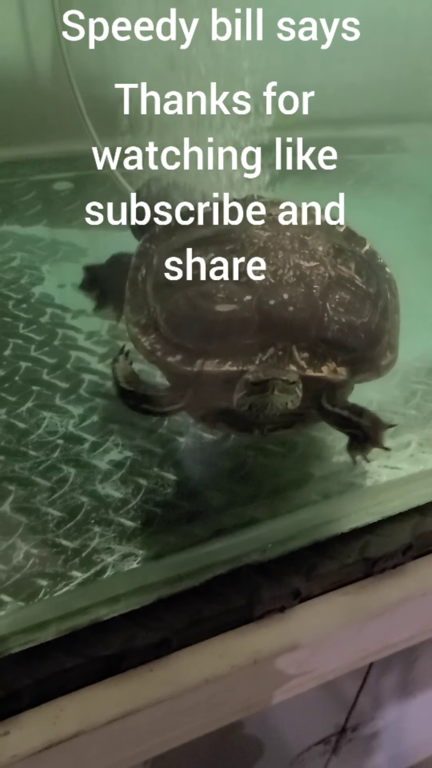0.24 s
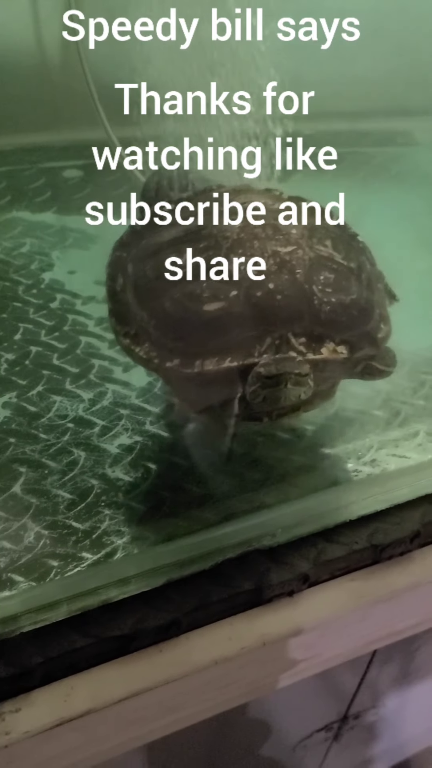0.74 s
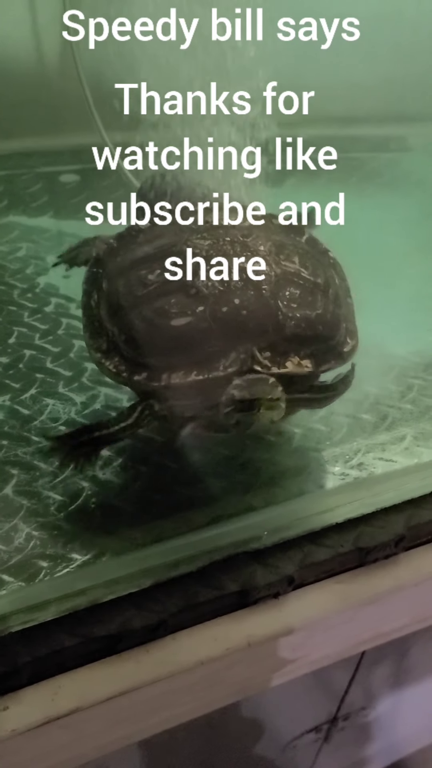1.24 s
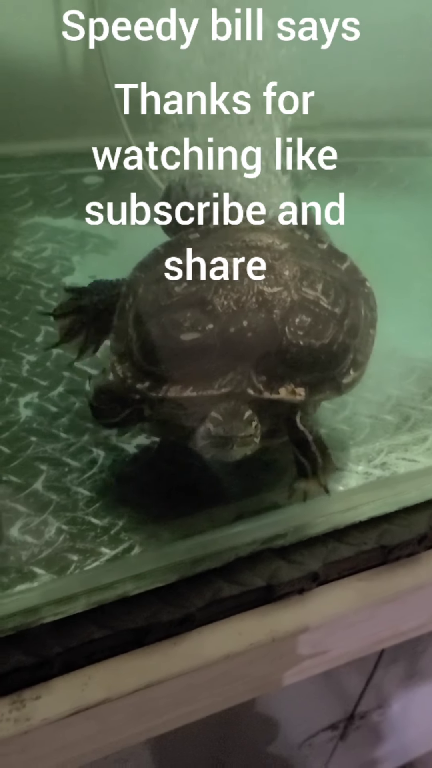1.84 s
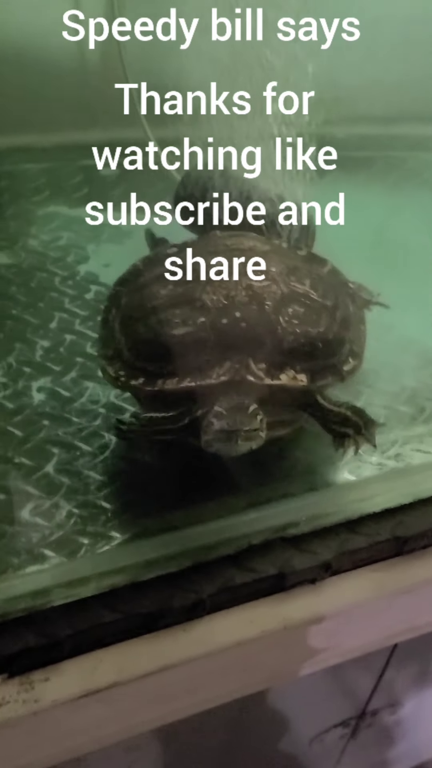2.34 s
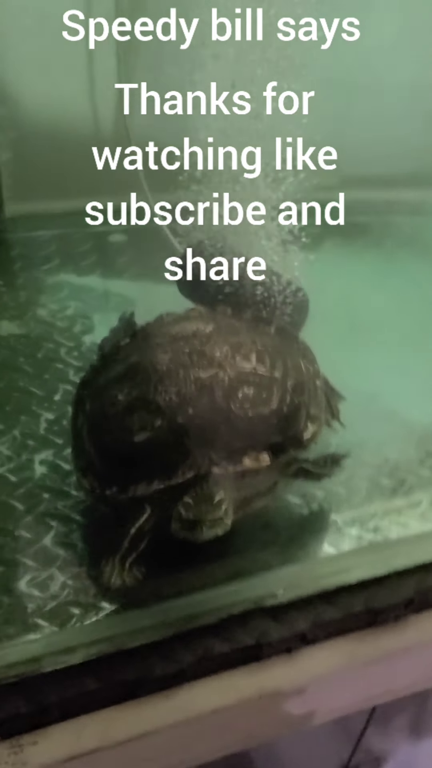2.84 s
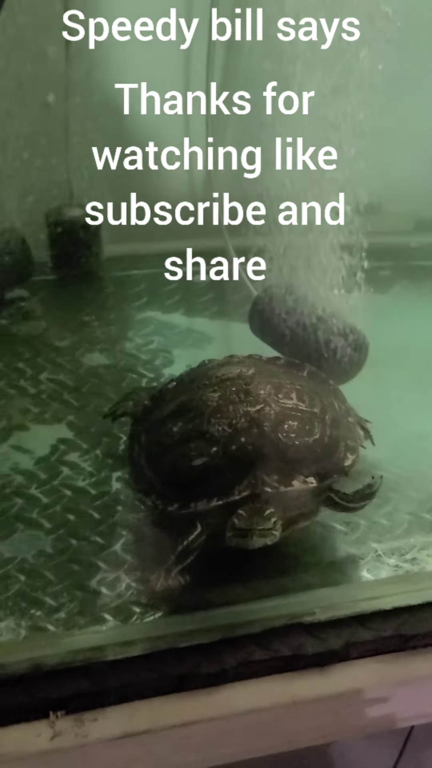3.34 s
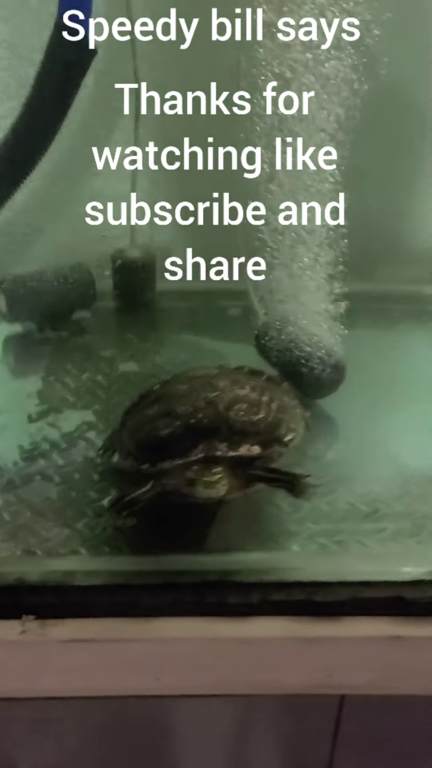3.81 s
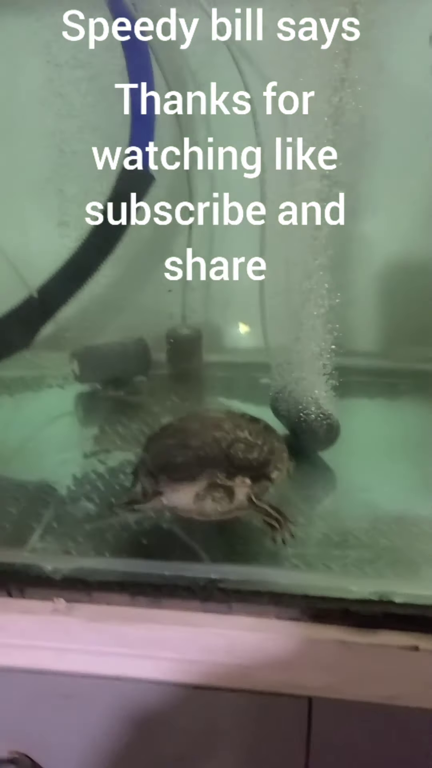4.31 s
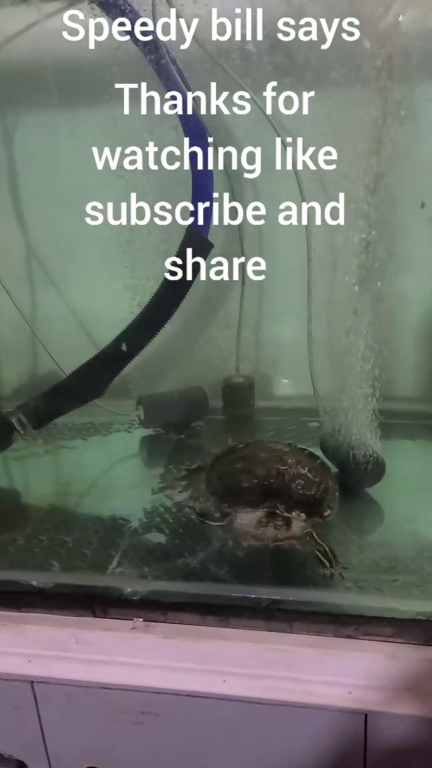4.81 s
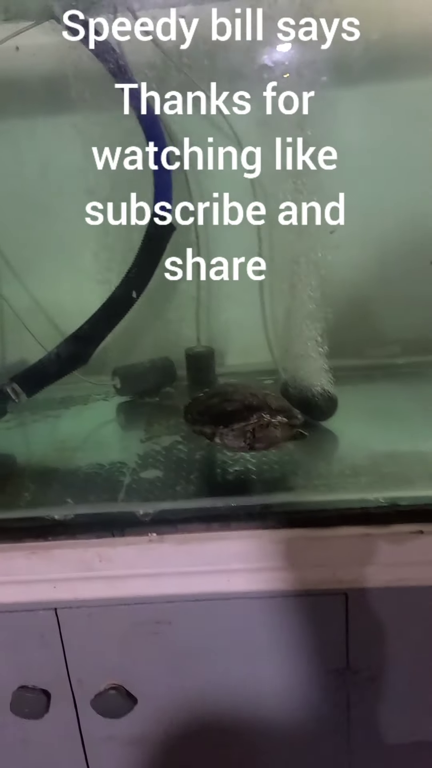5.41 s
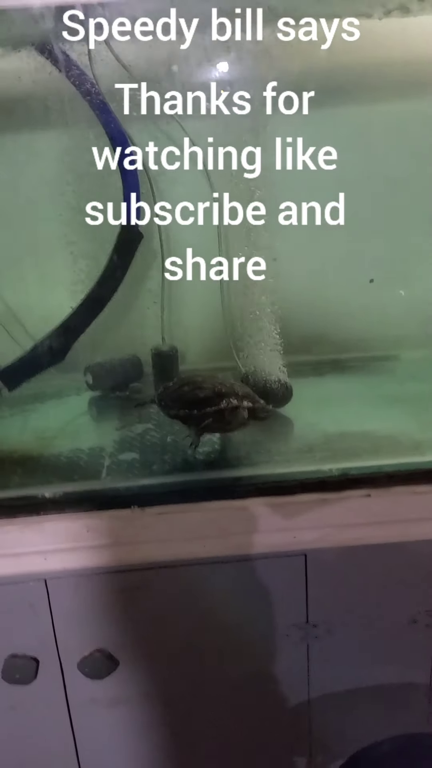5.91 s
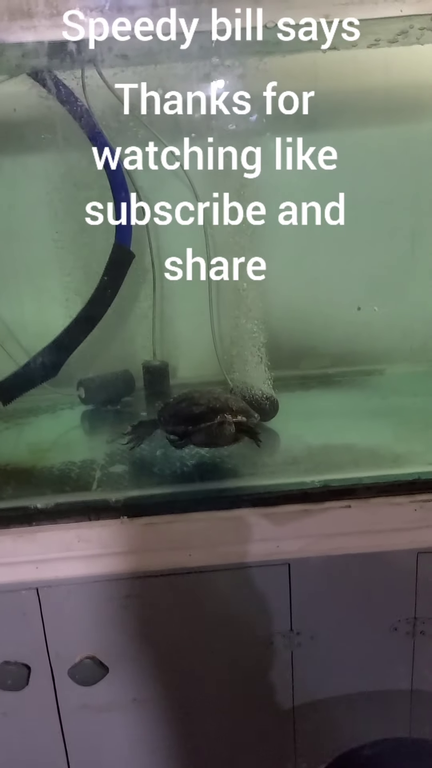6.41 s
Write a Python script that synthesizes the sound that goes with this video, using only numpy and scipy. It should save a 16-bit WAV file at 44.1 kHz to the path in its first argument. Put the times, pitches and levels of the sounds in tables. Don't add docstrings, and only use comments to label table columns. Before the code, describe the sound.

An aquarium air pump hums low and steady while bubbles gurgle and froth hisses, with a sharp wet snap and a later soft low thump.

```python
import sys
import numpy as np
from scipy import signal
from scipy.fft import rfft, irfft, next_fast_len
from scipy.io import wavfile
from scipy.ndimage import uniform_filter1d, map_coordinates

SR = 44100
rng = np.random.default_rng(int(sys.argv[2]) if len(sys.argv) > 2 else 0)


def makeup_ratio(level_db):
    decades = np.asarray(level_db, float) / 20
    return 10 ** decades


def inscribe(sig):
    pcm = np.round(np.clip(np.atleast_2d(sig).T, -1, 1) * 32767)
    wavfile.write(sys.argv[1], SR, pcm.astype(np.int16))


N = 293485
TIME = np.arange(N) / SR

# time in seconds, distance from 0 (at the glass) to 1 (across the room).
RETREAT = [
    (0, 0.024),
    (3.3, 0.088),
    (4.15, 0.5),
    (4.85, 0.6),
    (5.55, .75),
    (6.25, 0.87),
    (6.65, 1),
]
ROOM_REACH = 1.3

MAINS_HZ, STROKE_START_S = 60.03, .0053
# multiple of the mains, near level in dB, far level in dB, left-right difference near
# in dB, the same far in dB.
FUNDAMENTAL = (1, -35, -37.5, -60.5, -58)
# multiple of the mains, near level
# in dB, room level in dB, the room wave's sign and share (1 with the tank's, -1 against it).
STRONG_OVERTONES = [(2, -38.5, -83, -0.28), (4, -56.5, -53.5, -0.72), (6, -63.5, -52, 0.92),
                    (7, -53.5, -67, -0.18)]
# multiple of the mains, near level in dB, far level in dB.
STRONG_DIFFERENCE = [(2, -65, -58), (4, -76, -72), (6, -57, -56), (7, -71, -66)]
# multiple of the mains, near level in dB, far level in dB, left-right
# difference near in dB, the same far in dB.
WEAK_LINES = [(2.5, -56, -59, -87, -76), (3, -63, -57, -86, -85), (3.5, -62, -70, -88, -90),
              (5, -61, -64, -90, -66), (8, -62, -70, -65, -67), (9, -66, -64, -71, -71),
              (10, -63, -73, -68, -69), (11, -64, -61, -68, -67), (12, -60, -71, -67, -77),
              (13, -67, -65, -70, -73), (14, -65, -76, -69, -68), (15, -68, -79, -84, -85)]

# frequency in Hz, level in dB per Hz.
RUMBLE = [(20, -77), (40, -72.5), (90, -69), (200, -79), (300, -82.5), (450, -100)]
LEFT_GURGLE = [(300, -74.5), (450, -77), (700, -76), (1000, -78), (1400, -76), (1900, -78.5), (2200, -87.5)]
RIGHT_GURGLE = [(300, -73.5), (450, -75), (750, -75), (1050, -81), (1400, -77.5), (1900, -82), (2200, -86)]
LEFT_FIZZ = [(2200, -87), (3050, -82.5), (3350, -92), (4050, -88.5), (4800, -93), (5700, -89.5),
             (7000, -92.5), (8200, -85), (8600, -97.5), (9900, -101), (12200, -89), (12600, -105),
             (13200, -84.5), (15500, -91.5)]
RIGHT_FIZZ = [(2200, -88.5), (3050, -91.5), (3350, -87.5), (4000, -93.5), (4500, -87), (5700, -90),
              (7100, -85.5), (7700, -93.5), (8600, -95.5), (9500, -93.5), (11300, -91), (12000, -84),
              (13600, -85), (15700, -86)]
# frequency in Hz, likeness from -1 to 1.
RUMBLE_ALIKE = [(40, 1), (120, 0.9), (200, 1), (400, 0.12)]
GURGLE_ALIKE = [(250, .97), (400, .55), (700, .15), (1000, -.2), (1600, -.35), (2100, .3)]
FIZZ_ALIKE = [(3000, .35), (4000, .2), (9000, .15)]
# near dB, far dB, dB gained midway while the surface faces the phone.
GURGLE_NEAR_DB, GURGLE_FAR_DB, GURGLE_MIDWAY_DB = (-0.5, -1.7), (-5.5, -1.5), (-1.6, 1.8)
FIZZ_NEAR_DB, FIZZ_FAR_DB, FIZZ_MIDWAY_DB = (-3, -0.6), (-0.9, 0), (2.5, 0.94)
STROKE_PULSE_DB = -0.73
LEFT_LEAD_S = .00047

# near pitch in Hz, far pitch in Hz, width in Hz, near level in dB,
# far level in dB, left-right balance in dB.
PORES = [
    (2508, 2550, 60, -60.5, -56, -2),
    (2803, 2790, 130, -59.5, -59.5, -4),
    (5315, 5330, 112, -56.5, -55.5, -2.5),
]
# start in seconds, pitch in Hz, length in seconds, level in dB,
# left-right balance in dB.
WHISTLES = [(.22, 5460, 0.038, -52, -2), (1.0, 5450, .03, -54, -3), (2.335, 5280, 0.033, -48, -6),
            (3.9, 5640, .022, -52, 2), (3.96, 5330, 0.046, -52, -8), (5.1, 2580, 0.04, -48.5, -2),
            (5.8, 2570, 0.064, -50.5, -4), (6.1, 2560, 0.035, -51.5, -6), (6.19, 5350, .08, -57, -10),
            (4.786, 375, 0.0203, -37.5, 0), (4.801, 354, 0.052, -44, 2), (4.814, 412, 0.013, -41, 9),
            (6.5, 413.5, 0.063, -47, 0)]
# start in seconds, peak level in dB, 60 dB decay in seconds, left-right balance in dB.
SPLASHES = [
    (1.13, -44, .1, -3),
    (1.865, -43, .06, 4),
    (2.047, -38, .035, -4),
    (3.2, -44, .1, -2),
    (4.0, -40, .05, -3),
    (5.862, -39.5, .15, -6),
    (6.14, -43, .1, -2),
    (6.43, -43, .08, 2),
]
# start in seconds, peak level in dB, 60 dB decay in seconds, left-right
# balance in dB.
SNAP = [
    (2.913, -29, 0.022, -4),
    (2.917, -29, 0.025, -8.5),
    (2.925, -37, 0.089, -3),
    (2.938, -40, 0.075, -6),
]
SPLASH_RISE, SNAP_RISE = .07, .015
TICK_HZ, TICK_DB = 1400, -33
# resonance in Hz, width in Hz, level in dB.
PORT_CAVITY = [
    (7100, 640, 7),
    (11200, 1800, 3),
]
# start in seconds, level in dB.
GUSTS = [
    (4.421, -17),
    (4.525, -25),
    (4.572, -27),
]
PUFF_RISE_S, PUFF_T60_S, FLUTTER_HZ, FLUTTER_SHARE = .03, .27, 34, .7

TOP_HZ = 15760


def along(points, hz):
    point_hz, value = np.transpose(points)
    return np.interp(np.log(hz + 1), np.log(point_hz + 1), value)


def wobble(rate):
    knots = rng.standard_normal(int(N * rate / SR) + 4)
    return map_coordinates(knots, [TIME * rate])


def filtered(x, response):
    size = next_fast_len(N + 8192)
    spectrum = rfft(x, size) * response(np.fft.rfftfreq(size, 1 / SR))
    return irfft(spectrum, size)[..., :N]


def patchy(x, depth_db, window, bins, frames):
    raise NotImplementedError


def ports(left, right, hz):
    return makeup_ratio([along(left, hz), along(right, hz)])


def pan(left_right_db):
    return makeup_ratio([[left_right_db / 2], [-left_right_db / 2]])


def add(out, start_s, sound):
    part = out[:, max(round(start_s * SR), 0):][:, :sound.shape[1]]
    part += sound[:, :part.shape[1]]


def pump(away, far):
    def between(near_db, far_db):
        return near_db + far * (far_db - near_db)

    stroke = 2 * np.pi * MAINS_HZ * (TIME + STROKE_START_S)
    _, near_db, far_db, side_near_db, side_far_db = FUNDAMENTAL
    late = away ** 2.7
    mid = makeup_ratio(near_db + late * (far_db - near_db))
    side = makeup_ratio(between(side_near_db, side_far_db))
    out = np.sqrt(2) * np.cos(stroke - 0.37 * far) * (mid + side * [[1], [-1]])

    lines = []
    for k, near_db, far_db, side_near_db, side_far_db in WEAK_LINES:
        lines.append((k, makeup_ratio(between(near_db, far_db)), between(side_near_db, side_far_db)))
    for (k, near_db, room_db, sign), (_, side_near_db, side_far_db) in zip(STRONG_OVERTONES, STRONG_DIFFERENCE):
        size = (1 - away) * makeup_ratio(near_db) + away * sign * makeup_ratio(room_db)
        lines.append((k, size, between(side_near_db, side_far_db)))
    for k, size, side_db in lines:
        phase = k * stroke + (rng.uniform(0, 2 * np.pi) if k > 2 else -np.pi / 2)
        shake = makeup_ratio(.17 * k * wobble(4))
        mid = size * np.cos(phase)
        side = makeup_ratio(side_db) * np.sin(phase)
        out = out + np.sqrt(2) * shake * np.array([mid + side, mid - side])
    return out


def white_pair(alike, patchy_db, lead_s):
    z = signal.stft(rng.standard_normal((2, N)), nperseg=512)[2]
    field = uniform_filter1d(rng.standard_normal(z.shape[1:]), size=5, axis=0)
    field = uniform_filter1d(field, size=8, axis=1)
    pair = signal.istft(z * makeup_ratio(patchy_db * field / field.std()), nperseg=512)[1][:, :N] * np.sqrt(SR / 2)

    def mid_side(hz):
        turn = np.arccos(np.clip(along(alike, hz), -1, 1)) / 2
        return np.array([np.cos(turn), np.sin(turn)])

    mid, side = filtered(pair, mid_side)
    return filtered(np.array([mid + side, mid - side]),
                    lambda hz: np.exp(1j * np.pi * lead_s * hz * [[1], [-1]]))


def passing(away, near_db, far_db, midway_db):
    near_db, far_db, midway_db = np.reshape([near_db, far_db, midway_db], (3, 2, 1))
    return makeup_ratio(near_db + away * (far_db - near_db) + midway_db * np.sin(np.pi * away))


def water(away, far):
    def low(hz):
        return 1 / (1 + (hz / 2200) ** 8)

    def body(hz):
        return ports(LEFT_GURGLE, RIGHT_GURGLE, hz) * np.sqrt(low(hz)) / (1 + (230 / (hz + 1)) ** 4)

    def froth(hz):
        return ports(LEFT_FIZZ, RIGHT_FIZZ, hz) * np.sqrt(1 - low(hz))

    gurgle = filtered(white_pair(GURGLE_ALIKE, patchy_db=0.72, lead_s=0), body)
    fizz = filtered(white_pair(FIZZ_ALIKE, patchy_db=1.17, lead_s=LEFT_LEAD_S), froth)
    rumble = filtered(white_pair(RUMBLE_ALIKE, patchy_db=1.0, lead_s=0), lambda hz: makeup_ratio(along(RUMBLE, hz)))

    deep = filtered(gurgle, lambda hz: 1 / (1 + (hz / 900) ** 6))
    gurgle = passing(away, GURGLE_NEAR_DB, GURGLE_FAR_DB, GURGLE_MIDWAY_DB) * (gurgle - deep)
    gurgle += makeup_ratio(far * [[-.5], [-1.5]]) * deep
    fizz = passing(away, FIZZ_NEAR_DB, FIZZ_FAR_DB, FIZZ_MIDWAY_DB) * fizz

    stroke = makeup_ratio(STROKE_PULSE_DB * np.cos(2 * np.pi * MAINS_HZ * TIME))
    seethe = makeup_ratio(.5 * wobble(8) + .25 * wobble(25))
    return gurgle * stroke * makeup_ratio(0.48 * wobble(7.4)) + fizz * seethe + makeup_ratio(-2.5 * far) * rumble


def standing(x, depth_db):
    z = signal.stft(x, nperseg=2048)[2]
    field = uniform_filter1d(rng.standard_normal(z.shape), size=3, axis=1)
    field = uniform_filter1d(field, size=50, axis=2)
    return signal.istft(z * makeup_ratio(depth_db * field / field.std()), nperseg=2048)[1][:, :N]


def pores(far):
    out = np.zeros((2, N))
    for near_hz, far_hz, width_hz, near_db, far_db, left_right_db in PORES:
        pitch = near_hz + far * (far_hz - near_hz) + 30 * wobble(4)
        phase = 2 * np.pi * np.cumsum(pitch) / SR
        noise = rng.standard_normal((2, 3, N))
        noise = noise[:, :2] + 0.41 * noise[:, 2:]
        a, b = filtered(noise, lambda hz: 1 / (1 + 2j * hz / width_hz))
        ring = a * np.cos(phase) + b * np.sin(phase)
        flare = .7 * wobble(5) + .8 * wobble(14) + 1.2 * np.array([wobble(22), wobble(22)])
        level = makeup_ratio(near_db + far * (far_db - near_db) + flare)
        out += level * pan(left_right_db) * ring / ring.std()
    return out


def whistles():
    out = np.zeros((2, N))
    for start_s, hz, life_s, db, left_right_db in WHISTLES:
        t = np.arange(round(life_s * SR)) / SR
        swell = np.sin(np.pi * t / life_s) ** .7
        tone = swell * np.sin(2 * np.pi * hz * t + [[0], [.4]])
        add(out, start_s, makeup_ratio(db) * pan(left_right_db) * tone)
    return out


def splashes():
    out = np.zeros((2, N))
    t = np.arange(SR // 5) / SR
    for rows, rise in ((SPLASHES, SPLASH_RISE), (SNAP, SNAP_RISE)):
        for start_s, db, t60, left_right_db in rows:
            shape = makeup_ratio(db - 60 * t / t60) * (1 - np.exp(-t / (rise * t60)))
            add(out, start_s, pan(left_right_db) * shape * rng.standard_normal((2, len(t))))

    def colour(hz):
        cavity = np.ones_like(hz)
        for centre, width, db in PORT_CAVITY:
            cavity = cavity + makeup_ratio(db) * 1j * hz * width / (centre ** 2 - hz ** 2 + 1j * hz * width)
        return makeup_ratio(88.5) * ports(LEFT_FIZZ, RIGHT_FIZZ, hz) * [np.ones_like(hz), cavity]

    out = filtered(out, colour)
    for start_s, _, t60, _ in SNAP[:2]:
        tick = makeup_ratio(TICK_DB - 60 * t / (0.47 * t60)) * np.sin(2 * np.pi * TICK_HZ * t)
        add(out, start_s, pan(2.5) * tick)
    return out


def puff():
    def band(hz):
        return (hz / 32) ** 2 / (1 + (hz / 32) ** 2.5) / (1 + (hz / 75) ** 4)

    swings = filtered(rng.standard_normal(N), band)
    swings /= swings.std()
    out = np.zeros(N)
    for start_s, db in GUSTS:
        t = np.clip(TIME - start_s, 0, None)
        rise = np.sin(np.pi / 2 * np.clip(t / PUFF_RISE_S, 0, 1)) ** 2
        flutter = np.sqrt(2) * np.sin(2 * np.pi * FLUTTER_HZ * t - 1.5)
        mixed = FLUTTER_SHARE * flutter + (1 - FLUTTER_SHARE) * swings
        out += makeup_ratio(db - 60 * t / PUFF_T60_S) * rise * mixed
    return np.array([[.08], [1]]) * out


def scene():
    when, distance = np.transpose(RETREAT)
    away = np.clip(np.interp(TIME, when, distance), 0, 1)
    far = np.clip(ROOM_REACH * away, 0, 1)
    tank = pump(away, far) + standing(water(away, far), depth_db=2.5) + pores(far)
    return tank + whistles() + splashes() + puff()


def low_pass(x):
    return signal.sosfilt(signal.butter(12, 16460, fs=SR, output="sos"), x)


def record(dry):
    mix = filtered(dry, lambda hz: hz < TOP_HZ)
    return low_pass(mix)


dry = scene()
out = record(dry)
inscribe(out)
```